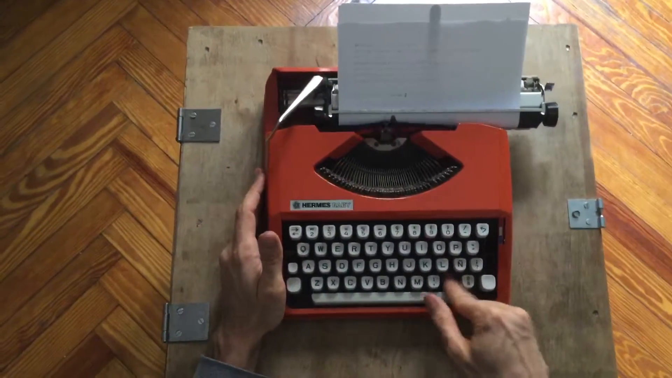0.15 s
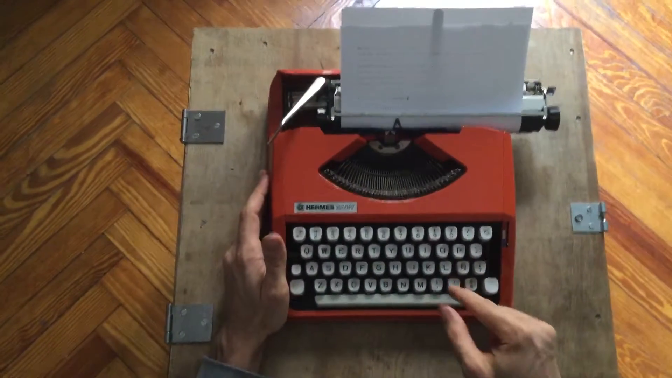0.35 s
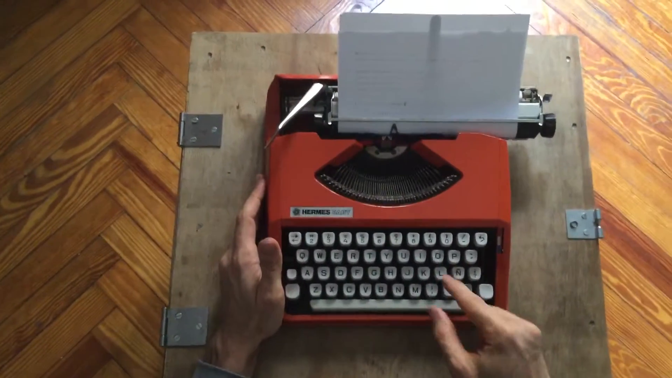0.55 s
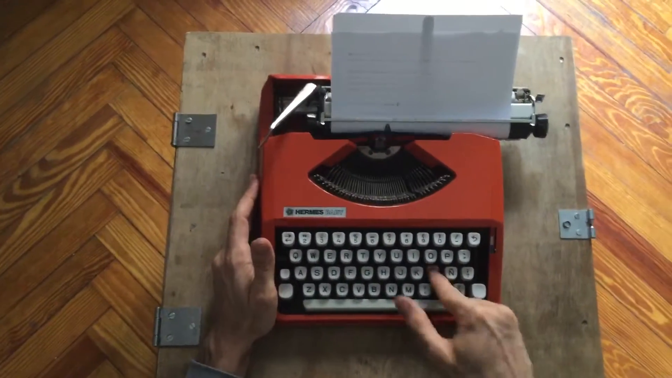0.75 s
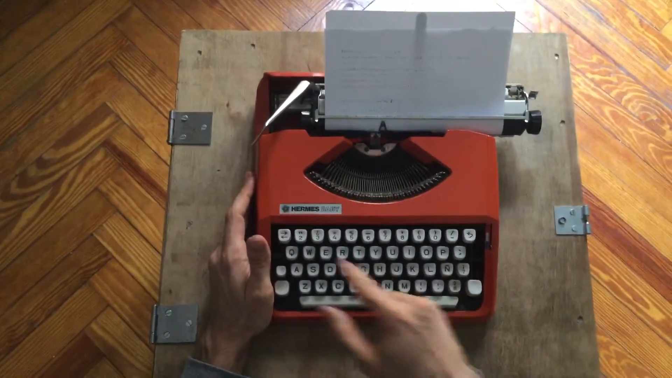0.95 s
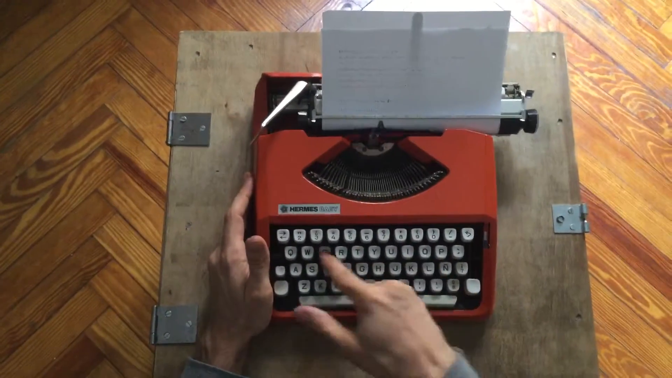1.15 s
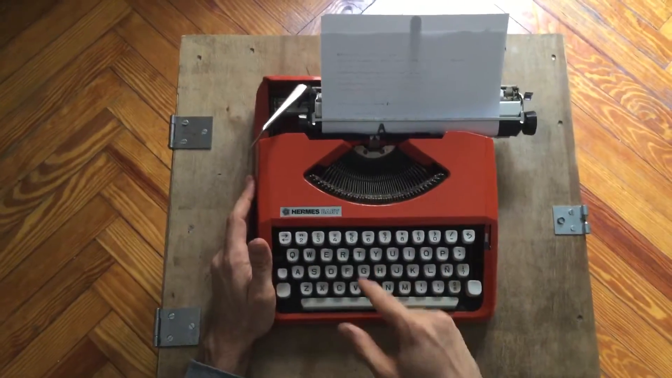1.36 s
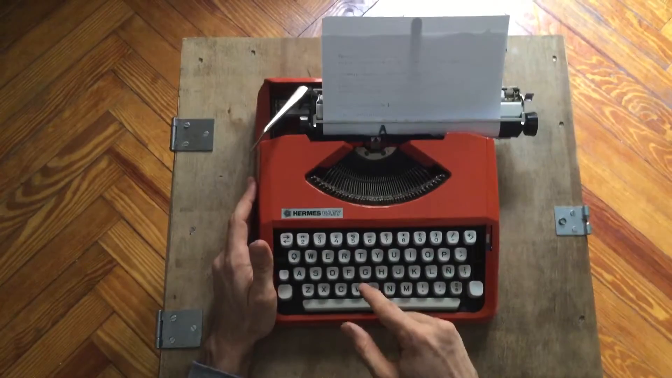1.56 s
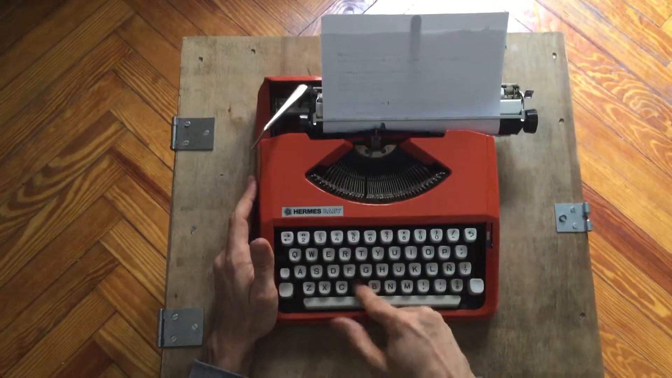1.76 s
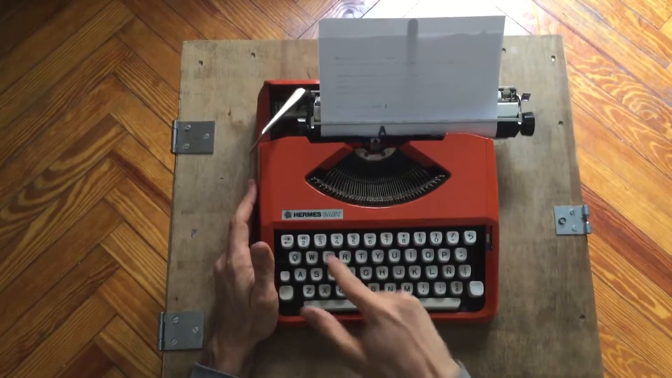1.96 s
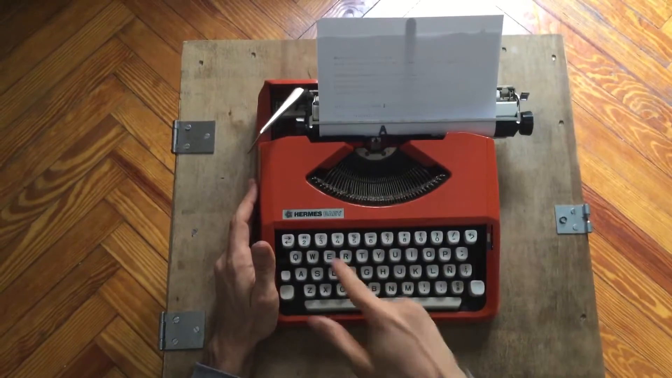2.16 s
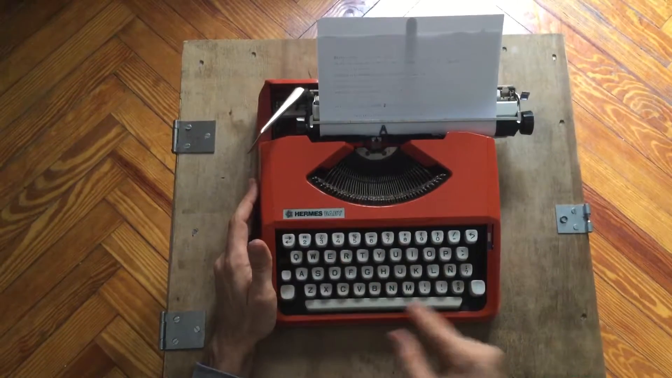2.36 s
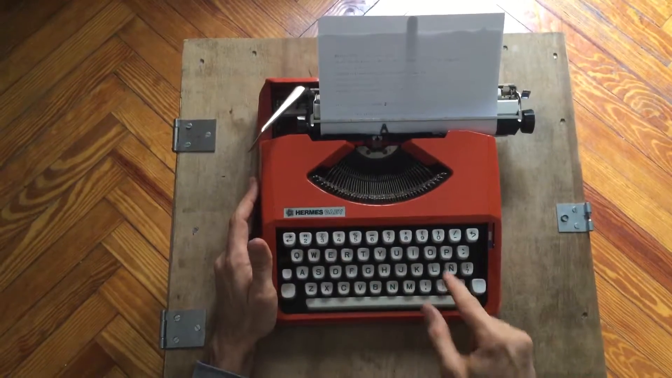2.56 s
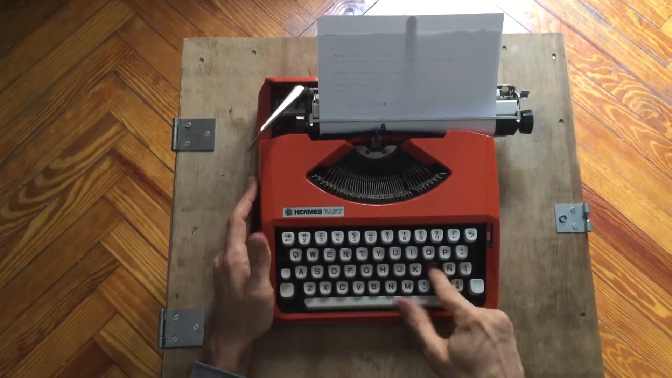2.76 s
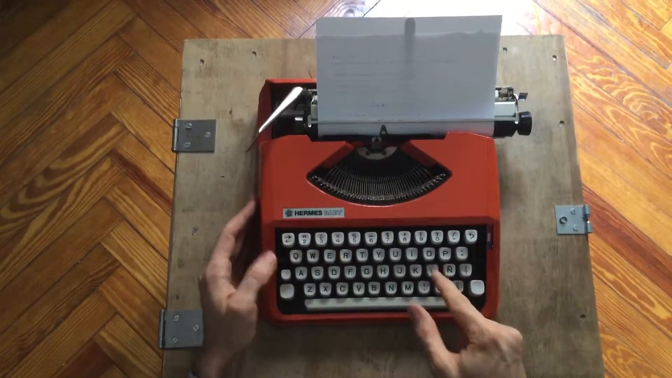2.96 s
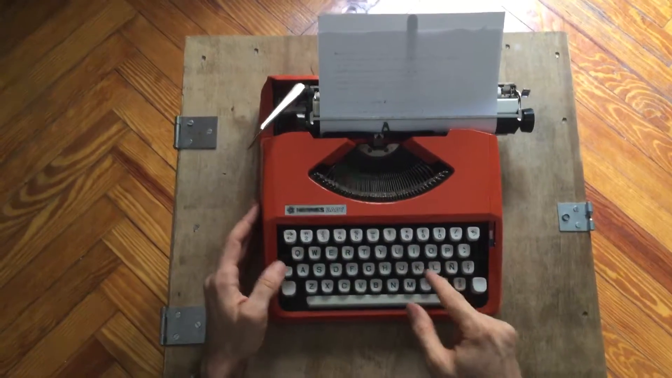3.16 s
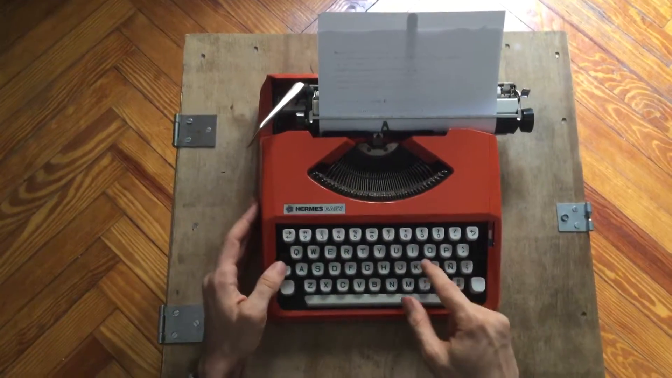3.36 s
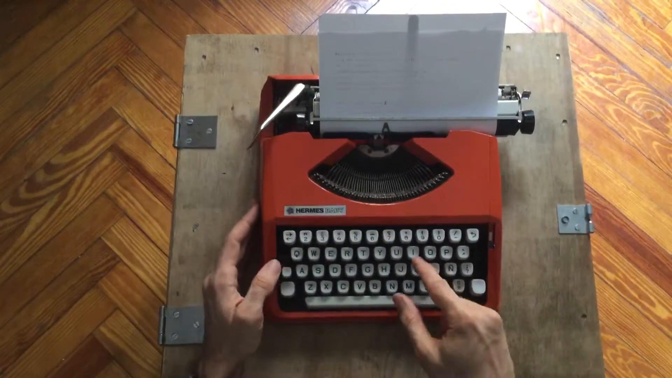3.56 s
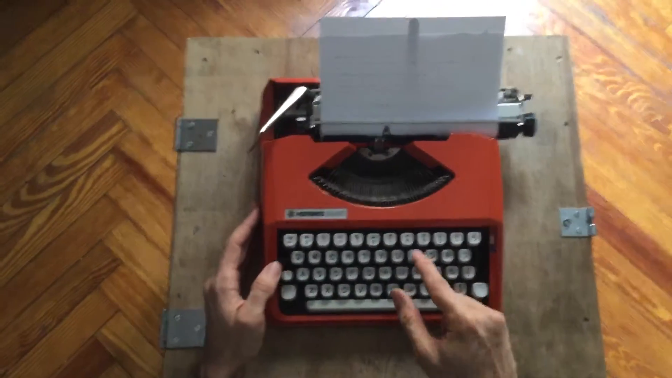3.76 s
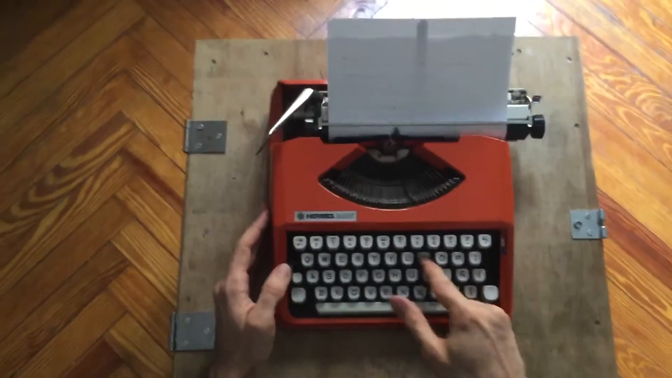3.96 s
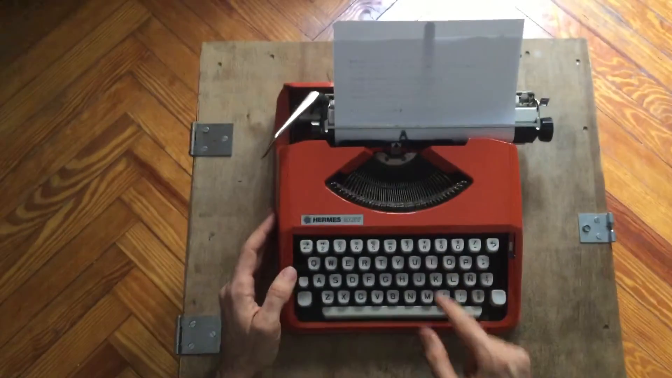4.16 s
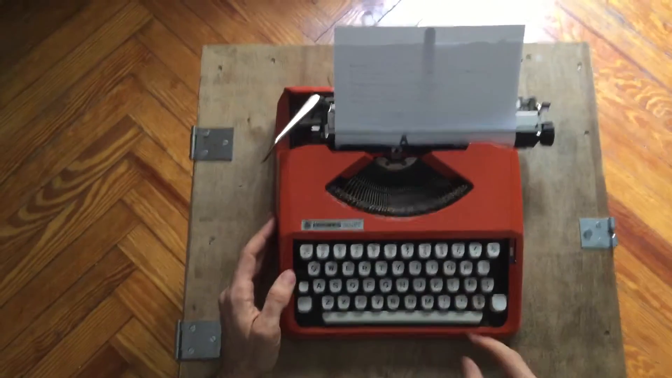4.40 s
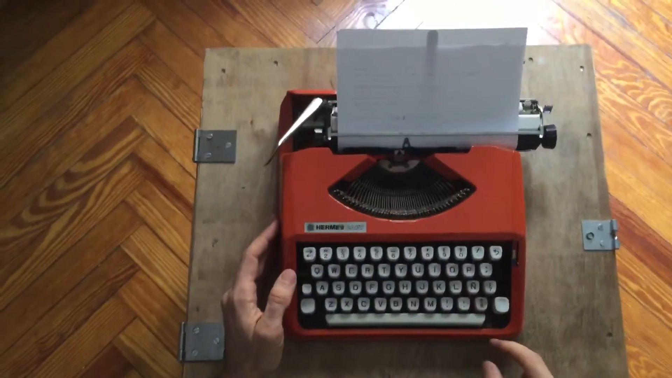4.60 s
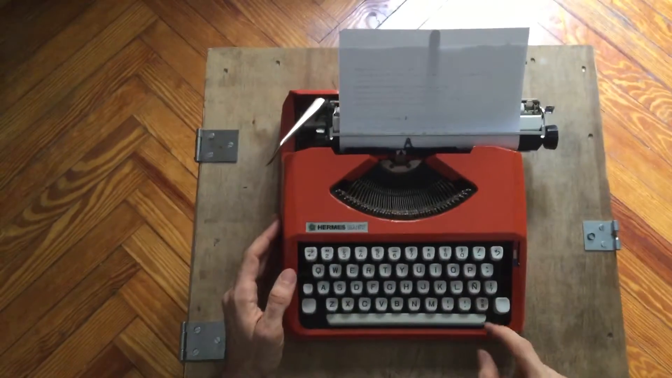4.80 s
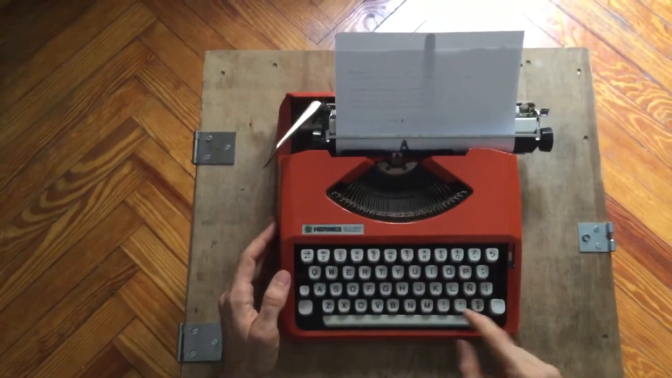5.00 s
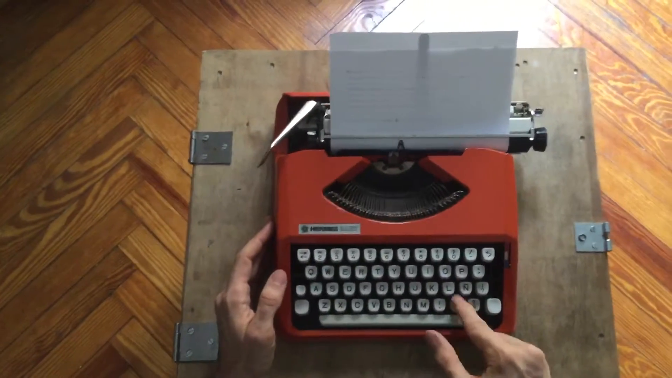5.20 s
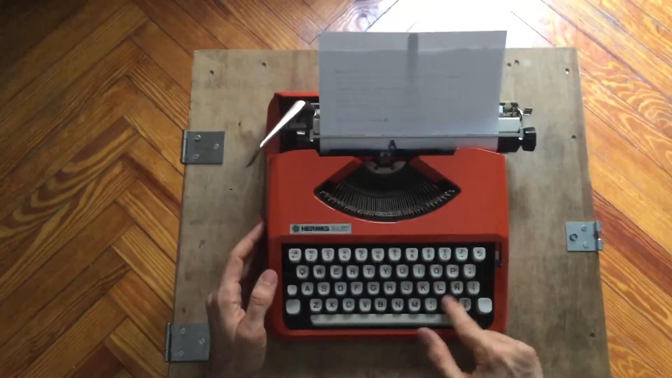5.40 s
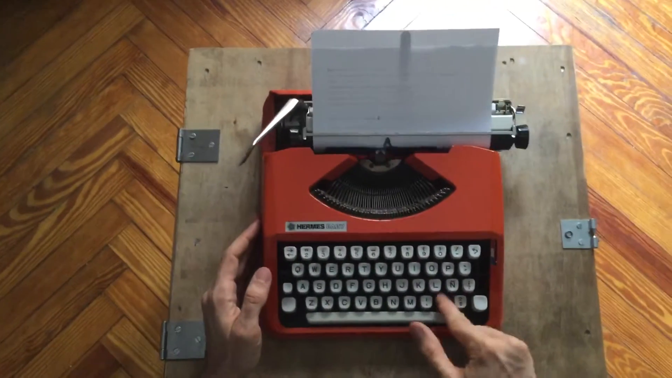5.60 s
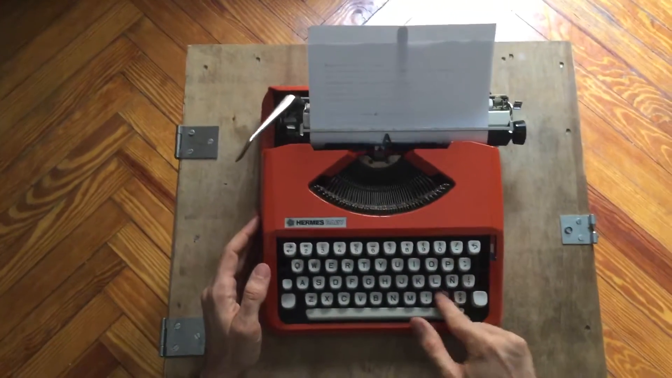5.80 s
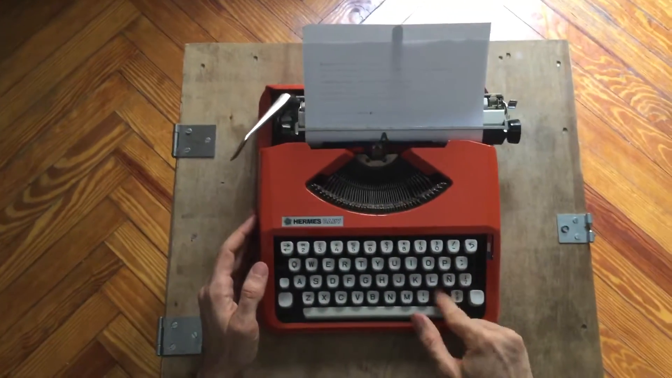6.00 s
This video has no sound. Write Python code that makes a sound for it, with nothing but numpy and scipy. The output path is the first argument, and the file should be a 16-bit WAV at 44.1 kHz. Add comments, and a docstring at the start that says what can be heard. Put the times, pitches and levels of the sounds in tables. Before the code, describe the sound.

A portable manual typewriter on a wooden board, heard close in a bare, lightly echoing room. Two quick, moderate strikes come first, then five slower, loud single clacks, each with a small key tick before it and a loose clattering knock after. After a quiet gap filled only by faint rumble, five brisk, evenly spaced strikes finish.

```python
"""In a bare room a small manual typewriter on a plywood board is typed with one finger.
Some keys tick as they go down; each type bar scrapes into its guide and cracks on the roller,
then bar, key and escapement fall back with softer knocks and pings. Sprays of tiny impacts drive
damped modes of levers, casing and board; the room adds echoes and a tail. A bell hum, a far tone,
low rumble and hiss lie underneath."""
import sys
import numpy as np
from scipy import signal
from scipy.io import wavfile
from scipy.ndimage import uniform_filter1d

SR = 44100
rng = np.random.default_rng(int(sys.argv[2]) if len(sys.argv) > 2 else 0)


def undo_db(level):
    """Turn decibels back into plain size, where 20 dB means ten times bigger."""
    steps = np.asarray(level, float) / 20
    return 10 ** steps


def unload_audio(sound):
    """Save the sound as a 16-bit wav file, at the path given as the first command line argument."""
    columns = np.transpose(np.atleast_2d(sound))
    # keep every value between -1 and 1, then stretch to whole-number steps
    steps = np.round(np.clip(columns, -1, 1) * 32767)
    wavfile.write(sys.argv[1], SR, steps.astype(np.int16))


N = 266364


def evened(x):
    """Scales to rms 1."""
    return x / np.sqrt(np.mean(x ** 2) + 1e-20)


def peaked(x):
    """Scales to peak 1."""
    return x / abs(x).max()


def read(points, hz):
    """Interpolates a table of (frequency, value) over log frequency."""
    f, value = np.transpose(points)
    return np.interp(np.log(hz + 1), np.log(f + 1), value)


def add(mix, s, sound):
    """Adds a sound into the mix at s seconds."""
    part = mix[max(round(s * SR), 0):][:len(sound)]
    part += sound[:len(part)]


def ring(modes, spread=0.):
    """Sum of dying sines, peak 1; spread varies their pitch and level at random."""
    hz, db, t60 = np.transpose(modes)[:, :, None]
    t = np.arange(round(t60.max() * SR)) / SR
    detune, relevel = spread * rng.standard_normal((2, len(modes), 1))
    decay = undo_db(db - 60 * t / t60 + 60 * relevel)
    return peaked((decay * np.sin(2 * np.pi * hz * (1 + detune) * t)).sum(0))


def snap(modes, rise_s):
    """Slightly detuned modes that swell over the contact time, peak 1."""
    loose = ring(modes, spread=.03)
    t = np.arange(len(loose)) / SR
    return peaked(loose * (1 - np.exp(-t / rise_s)) ** 2)


def rattle(rise_s, fall_s, per_s, size_db):
    """A spray of tiny impacts of unequal size that swells and dies, energy 1."""
    t = np.arange(round(.25 * SR)) / SR
    chance, sign, size = rng.random((3, len(t)))
    hits = (chance < per_s / SR) * np.sign(sign - .5) * undo_db(-size_db * np.log(size + 0.0015))
    hits = hits * (1 - np.exp(-(t + 1e-4) / rise_s)) * np.exp(-t / max(fall_s, 1e-3))
    return hits / (np.linalg.norm(hits) + 1e-9)


def push(ms):
    """A blunt shove, as rubber feet or a fingertip pass it on, sum 1."""
    shape = signal.windows.hann(max(round(ms * SR / 1000), 4))
    return shape / shape.sum()


# type bar on roller: (time [s], crack [dB], casing drive [dB], board drive [dB], bar shiver [dB])
STRIKES = [(0.0994, -15.5, -19.5, -45, -18), (0.2446, -10.5, -26.5, -26, -34), (0.802, -1, -18, -21.5, -35),
           (1.2036, -1, -14, -23, -9.5), (1.842, -1, -15.5, -23, -40), (2.1267, -0.5, -15.5, -22, -19),
           (2.8344, -0.1, -15, -21, -42.5), (3.9745, -2, -13.5, -16.5, -10),
           (5.2232, -7.5, -13, -21, -43.5), (5.3982, -11.5, -20, -33, -38), (5.5779, -9.5, -12.5, -36, -17),
           (5.7633, -9.5, -14, -54, -39), (5.9485, -9, -13.5, -31, -32)]
# modes of the crack: (frequency [Hz], relative level [dB], t60 [s])
CRACK_MODES = [(3840, -13, 0.0031), (5308, -8.5, 0.0035), (6128, -10, 0.0042), (7860, -0.5, 0.0014)]
# modes of its top: (frequency [Hz], relative level [dB], t60 [s])
CRACK_TOP_MODES = [(9300, -5, .003), (10900, -6, .003), (12500, 0, .004), (14200, -3, .003)]
# type bar modes, also rung by presses(): (frequency [Hz], relative level [dB], t60 [s])
BAR_MODES = [(4370, -2, 0.0072), (5300, -6.5, 0.0066), (5210, -8.5, 0.026), (5544, 0.5, 0.036),
             (5410, 1.5, 0.01), (7480, -3.5, 0.017)]


def strikes(steel, rung, casing, board):
    """Returns the cracks; each blow also drives bar, levers, casing and board."""
    scrape_db, carrier_db, clatter_db, early_casing_db = -8.5, 1.5, 6.5, -9
    cracks = np.zeros(N)
    for s, crack_db, casing_db, board_db, shiver_db in STRIKES:
        top_db = -7 + 0.67 * crack_db  # the top grows more slowly than the middle
        add(cracks, s - .0006, undo_db(crack_db) * snap(CRACK_MODES, rise_s=.0006))
        contacts = rattle(.0002, .0012, 6000, 2)[:400]
        top = peaked(np.convolve(snap(CRACK_TOP_MODES, rise_s=.0004), contacts))
        add(cracks, s - .0006, undo_db(top_db) * top)
        this_bar = ring(BAR_MODES, spread=.03)  # each letter has its own bar
        scrape = rattle(.001, .005, 9000, 2)[round(.012 * SR)::-1]  # swells into the guide
        add(rung, s - .012, undo_db(crack_db + scrape_db) * np.convolve(scrape, this_bar))
        # the ribbon carrier jumps up and jolts the casing
        add(steel, s - .006, undo_db(top_db + carrier_db) * rattle(0.00062, 0.015, 7500, 6))
        add(casing, s - .006, undo_db(casing_db + early_casing_db) * rattle(0.00033, 0.0025, 3000, 3.5))
        shiver = signal.oaconvolve(rattle(0.00081, 0.0037, 4500, 1.4), this_bar)
        add(rung, s, undo_db(shiver_db) * shiver)
        add(steel, s, undo_db(top_db + clatter_db) * rattle(0.00033, 0.031, 8000, 2.5))
        # the blow reaches the shell late
        add(casing, s + 0.0025, undo_db(casing_db) * rattle(0.026, 0.0064, 4000, 4))
        add(board, s, undo_db(board_db) * push(1.8))
    return cracks


# keys going down from rest: (time [s], tick [dB], lever rattle [dB], thump [dB])
PRESSES = [(0.7745, -17, -6.5, -39.5), (1.1727, -24, -7, -26.5), (1.8145, -22, -12, -37),
           (2.0976, -14.5, -8.5, -27), (2.8075, -14.5, -6, -38), (3.9497, -23, -8.5, -46),
           (5.191, -18.5, -10, -45)]
# floorboards under the plywood: (frequency [Hz], relative level [dB], t60 [s])
FLOOR_MODES = [(52.3, 0.5, 0.17), (68, -3, .12)]


def presses(steel, rung, casing, board):
    """A very faint swelling rustle, a bright tick, a quick-starting, slowly dying lever rattle, a thump."""
    rustle_db, casing_under_db, board_under_db, thump_after_s = -41, -13, -24.5, 0.014
    for s, tick_db, push_db, thump_db in PRESSES:
        rustle = rattle(.001, .006, 6000, 2)[round(.016 * SR)::-1]  # reversed, so it swells
        rustle = np.convolve(rustle, ring(BAR_MODES, spread=.05))
        add(rung, s - .016, undo_db(push_db + rustle_db) * rustle)
        # the key bottoms
        add(rung, s + thump_after_s, undo_db(thump_db) * np.convolve(push(8.1), ring(FLOOR_MODES)))
        tick = np.diff(rattle(.0002, .0015, 15000, 2), prepend=0)
        add(steel, s, undo_db(tick_db) * tick)
        add(steel, s, undo_db(push_db) * rattle(0.002, 0.056, 8000, 2.5))
        add(casing, s + .003, undo_db(push_db + casing_under_db) * rattle(.006, .028, 3000, 5))
        add(board, s + 0.0032, undo_db(push_db + board_under_db) * push(2.4))


# key let go, bar drops on its rest: (time [s], steel [dB], casing [dB], board [dB])
DROPS = [(0.001, -7.5, -20, -31.5), (0.165, -7.5, -19, -35), (0.325, -8, -20.5, -23),
         (0.8925, -9.5, -21, -28), (1.2876, -9, -20, -24), (1.935, -11, -19, -27.5), (2.222, -11, -23, -25),
         (2.9277, -12.5, -21, -31), (4.0798, -13, -20.5, -33), (5.3003, -10.5, -22, -23.5),
         (5.474, -10, -23, -30), (5.657, -9, -21, -28), (5.837, -9.5, -21, -24.5), (6.0295, -8.5, -18, -32)]
# escapement catches the carriage: (time [s], steel [dB], board [dB], pawl ping [dB])
CATCHES = [(0.0277, -17, -29, -35), (0.1829, -23, -24, -36), (0.3664, -17.5, -26, -47),
           (0.918, -17, -24, -35), (1.3151, -15.5, -25, -23.5), (1.9603, -13, -24.5, -26),
           (2.254, -14, -29.5, -25.5), (2.961, -14.5, -29, -44), (4.1197, -14, -30, -33.5),
           (5.328, -12.5, -26.5, -47), (5.4951, -11, -24.5, -44), (5.6918, -16, -28, -35),
           (5.8706, -12.5, -28.5, -45)]
# pawl click, then a lever clatter 12.7 ms later:
# (click time [s], click [dB], ping [dB], clatter [dB], clatter casing [dB])
CLICK_CLATTERS = [(0.077, -20.5, -30, -6, -26), (0.2226, -29, -33, -8.5, -13.5),
                  (5.1974, -30.5, -41, -3.5, -29.5), (5.3797, -20, -30, -4, -14),
                  (5.5601, -18.5, -26, -5.5, -22), (5.7435, -19.5, -28, -6, -24),
                  (5.9296, -22.5, -32, -4.5, -42)]
# finger lands on a key still moving: (time [s], level [dB])
LANDINGS = [(0.2119, -30), (5.3586, -15.5), (5.72, -18), (5.9105, -16.5)]


def knocks(steel, casing, board):
    """Each knock rattles the levers, then the casing, then shoves the board."""
    drop_s, catch_s, click_s, clatter_s = (.006, .016), (.0003, .009), (.0004, .013), (.0018, .02)  # rise, fall
    catch_casing_db, click_casing_db, click_board_db, clatter_board_db = -13, -9.5, -18.5, -21  # under steel
    clatter_after_s = .0127
    rows = [(*row, *drop_s) for row in DROPS]
    for s, db, board_db, _ in CATCHES:
        rows.append((s, db, db + catch_casing_db, board_db, *catch_s))
    for s, db in [row[:2] for row in CLICK_CLATTERS] + list(LANDINGS):
        rows.append((s, db, db + click_casing_db, db + click_board_db, *click_s))
    for s, _, _, db, casing_db in CLICK_CLATTERS:
        rows.append((s + clatter_after_s, db, casing_db, db + clatter_board_db, *clatter_s))
    for s, steel_db, casing_db, board_db, rise_s, fall_s in rows:
        add(steel, s, undo_db(steel_db) * rattle(rise_s, fall_s, 7000, 1.5))
        add(casing, s + rise_s, undo_db(casing_db) * rattle(.004, fall_s, 3000, 4))
        add(board, s + 2 * rise_s, undo_db(board_db) * push(3))


# further pawl pings: (time [s], level [dB])
FURTHER_PINGS = [(2.9276, -28.5), (4.1008, -30.5), (5.2097, -25.5), (5.4004, -24.5)]


def pings():
    """Pawl pings: one short mode each, set off by a brief spray of contacts."""
    catch_ping, click_ping = (3240, 0.012), (2980, 0.009)  # Hz, t60 s
    drop_ping_db = -25.5  # under the steel of the drop
    rows = [(s, db, *catch_ping) for s, _, _, db in CATCHES]
    rows += [(s, db + drop_ping_db, *click_ping) for s, db, *_ in DROPS]
    rows += [(s, db, *click_ping) for s, _, db, *_ in CLICK_CLATTERS]
    rows += [(s, db, *click_ping) for s, db in FURTHER_PINGS]
    out = np.zeros(N)
    for s, db, hz, t60_s in rows:
        contacts = rattle(0.0012, 0.0037, 3000, 0.97)[:400]
        ping = np.convolve(contacts, ring([(hz, 0, t60_s)], spread=0.025))
        add(out, s, undo_db(db) * peaked(ping))
    return out


# a hand brushes the machine: (time [s], steel [dB], casing [dB], board [dB], rattle fall [s])
TOUCHES = [(1.153, -80, -50, -38, .01), (3.36, -70, -58, -66, .03), (3.51, -85, -56, -70, .006),
           (3.6, -70, -58, -66, .02), (3.78, -62, -58, -64, .03), (3.888, -39, -53, -62, .02),
           (4.541, -60, -43, -56, .003)]


def touches(steel, casing, board):
    """A brushing hand: blunted rattles drive levers and casing, a soft shove the board."""
    for s, steel_db, casing_db, board_db, fall_s in TOUCHES:
        add(steel, s, undo_db(steel_db) * np.convolve(push(.3), rattle(.003, fall_s, 5000, 2)))
        add(casing, s, undo_db(casing_db) * np.convolve(push(.9), rattle(.001, fall_s, 3000, 2)))
        add(board, s, undo_db(board_db) * push(6.3))


# levers, so many and so damped that they blur: (frequency [Hz], relative level [dB], t60 [s])
STEEL_MODES = [(2100, -6, .004), (3000, -4, .004), (4000, -3, .003), (5500, -2, .002), (7000, -3, .002),
               (8600, -4, .0015), (10300, -4, .0015), (12300, -3, .0012), (14300, -3, .0015)]
# casing shell: (frequency [Hz], relative level [dB], t60 [s])
CASING_MODES = [(394, -20.5, 0.17), (457, -4, 0.085), (544, -7, 0.077), (774, -13, 0.12), (883, 1.5, 0.17),
                (1012.6, 9, 0.026), (1160, 4.5, 0.062), (1223.4, 10.5, 0.021), (1296, 3, 0.024),
                (1299, -12.5, 0.054), (1890, -4.5, 0.037), (2330, 4, .015)]
# plywood board: (frequency [Hz], relative level [dB], t60 [s])
BOARD_MODES = [(60, -9, 0.096), (81, -13.5, 0.098), (102, -20.5, 0.059), (118.66, 3, 0.43),
               (138.9, 4, 0.26), (158.8, 2.5, 0.28), (188.5, -2, 0.16), (213, -7.5, 0.029),
               (280, -8.5, 0.11), (296, -18.5, 0.05)]


def body(steel, casing, board):
    """Levers, casing and board ring as fixed sets of modes under their drives."""
    parts = ((steel, STEEL_MODES), (casing, CASING_MODES), (board, BOARD_MODES))
    return sum(signal.oaconvolve(drive, ring(modes))[:N] for drive, modes in parts)


# off casing lid, board, floor and near wall: (delay [s], level [dB])
ECHOES = [(.0048, -14.5), (.0064, -19.5), (.0095, -27), (0.012, -30)]
# decay of the tail: (frequency [Hz], t60 [s])
ROOM_T60 = [(100, .42), (300, .38), (1000, .43), (3000, .44), (6000, .41), (10000, .34), (15000, .3)]


def room(x, aimed):
    """A few echoes, then three sparse tails fed in turn, each band dying at its own speed."""
    aimed_db, tail_db, turn_rad_per_s = -5.5, -6.0, 17
    out = x + aimed
    for s, db in ECHOES:
        add(out, s, undo_db(db) * (x + aimed))
    taps = np.zeros((3, SR))
    slots = np.arange(400, SR - 12, 12)  # one tap at random in every 12 samples
    at = slots + rng.integers(0, 12, (3, len(slots)))
    np.put_along_axis(taps, at, rng.choice([-1., 1.], at.shape), 1)
    hz, t, z = signal.stft(taps, SR, nperseg=256)
    decay = undo_db(-60 * t / read(ROOM_T60, hz)[:, None])
    tails = signal.istft(z * decay, SR, nperseg=256)[1]
    sent = x + undo_db(aimed_db) * aimed  # cracks and pings beam up at the microphone
    turn = np.arange(N) / SR * turn_rad_per_s
    for k, tail in enumerate(tails):
        feed = np.sqrt(2 / 3) * np.cos(turn + k * np.pi / 3) * sent
        out += undo_db(tail_db) * signal.oaconvolve(feed, tail / np.linalg.norm(tail))[:N]
    return out


# margin bell: (frequency [Hz], relative level [dB], t60 [s])
BELL_MODES = [(977, 0, 2.2)]
# the bell hums faintly after some jolts: (time [s], level [dB])
BELL_SHAKES = [(.33, -71), (1.2, -74), (2.13, -67), (2.83, -72)]
# a faint far tone: (time [s], frequency [Hz], level before wavering [dB])
FAR_TONE = [(4.3, 490, -90), (4.37, 500, -72), (4.5, 535, -71), (4.57, 545, -90)]


def faint_tones():
    """The bell's dying hum and one gliding, wavering far tone."""
    out = np.zeros(N)
    for s, db in BELL_SHAKES:
        add(out, s, undo_db(db) * ring(BELL_MODES))
    s, hz, db = np.transpose(FAR_TONE)
    t = np.arange(s[0], s[-1], 1 / SR)
    waver = 1 + 0.43 * evened(uniform_filter1d(rng.standard_normal(len(t)), size=600))
    phase = 2 * np.pi * np.cumsum(np.interp(t, s, hz)) / SR
    add(out, s[0], undo_db(np.interp(t, s, db)) * waver * np.sin(phase))
    return out


# relative spectrum: (frequency [Hz], density [dB per Hz])
RUMBLE_SPECTRUM = [(15, -47.5), (25, -27), (48, -2.5), (123, 0.5), (153, -17.5), (242, -10.5), (270, -13),
                   (863, -31), (1130, -30.5), (1260, -31.5), (2110, -35), (8830, -44), (16000, -56)]
# opens swollen by typing just ended, then drifts: (time [s], level [dB])
RUMBLE_LEVEL = [(0, -38.5), (0.698, -64.5), (1.7, -62.5), (2.598, -65), (3.9, -62.5), (4.35, -62),
                (4.5, -60.5), (4.849, -63), (5.15, -62)]


def rumble():
    """Distant low noise, lumpy in time and pitch, over microphone hiss."""
    hiss_db, lump_db = -88, 3.5
    frames, hz = N // 256 + 5, np.fft.rfftfreq(1024, 1 / SR)
    real, imag, patches = rng.standard_normal((frames, 513, 3)).T
    patches = uniform_filter1d(patches, size=8, axis=0)
    patches = evened(uniform_filter1d(patches, size=14, axis=1))
    lumps_db = lump_db * patches / (1 + (hz[:, None] / 1500) ** 2)  # smoother in the treble
    spectrum = (real + 1j * imag) * undo_db(read(RUMBLE_SPECTRUM, hz)[:, None] + lumps_db)
    noise = evened(signal.istft(spectrum, nperseg=1024, noverlap=768)[1][:N])
    level_db = np.interp(np.arange(N) / SR, *np.transpose(RUMBLE_LEVEL))
    return undo_db(level_db) * noise + undo_db(hiss_db) * rng.standard_normal(N)


def scene():
    """All impacts drive the same levers, casing and board; the room answers over the background."""
    steel, rung, casing, board = np.zeros((4, N))  # rung: parts that already ring
    aimed = strikes(steel, rung, casing, board) + pings()
    presses(steel, rung, casing, board)
    knocks(steel, casing, board)
    touches(steel, casing, board)
    machine = rung + body(steel, casing, board)
    return (room(machine, aimed) + faint_tones() + rumble())[None]


def band_limit(x):
    """A steep low-pass at the top of the band."""
    return signal.sosfilt(signal.butter(12, 16520, fs=SR, output="sos"), x)


def record(dry):
    """A small microphone loses the deepest bass and rounds off the highest peaks; then a band limit."""
    ceiling, bass_hz, top_hz = 1.3, 49, 15400
    bassless = signal.sosfilt(signal.butter(4, bass_hz, "high", fs=SR, output="sos"), dry)
    rounded = ceiling * np.tanh(bassless / ceiling)
    edge = signal.firwin(255, top_hz, window=("kaiser", 7), fs=SR)
    mix = signal.oaconvolve(rounded, edge[None], "same")
    return band_limit(mix)


dry = scene()
out = record(dry)
unload_audio(out)
```